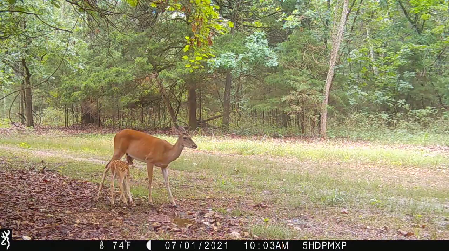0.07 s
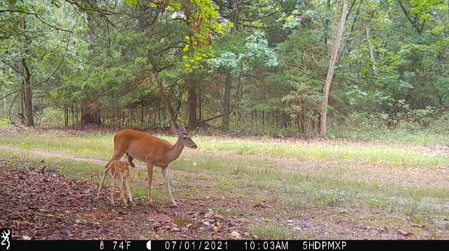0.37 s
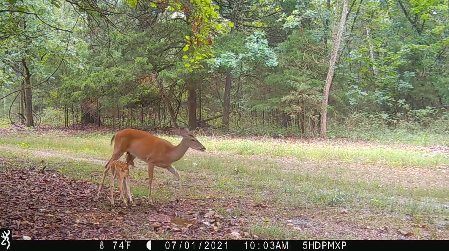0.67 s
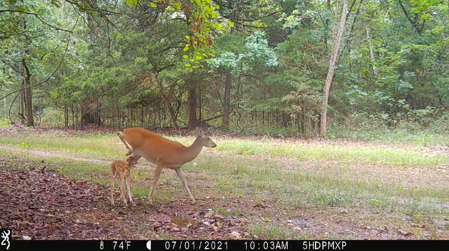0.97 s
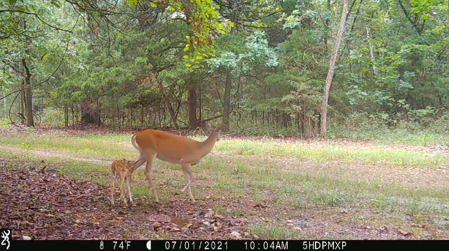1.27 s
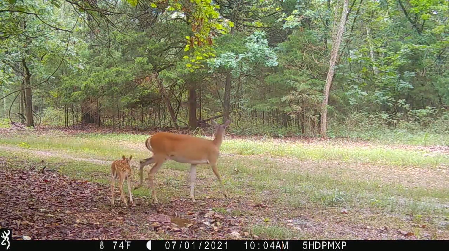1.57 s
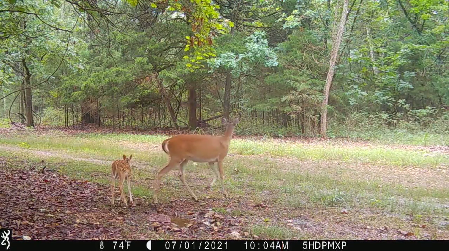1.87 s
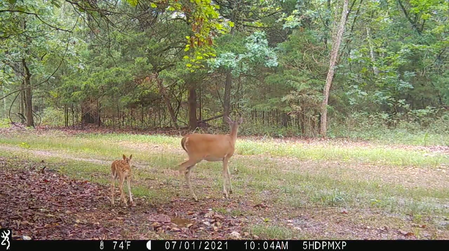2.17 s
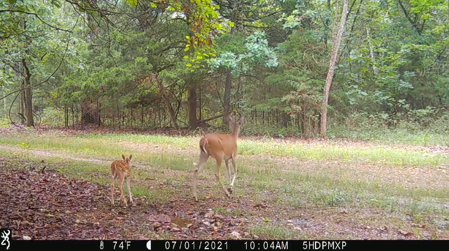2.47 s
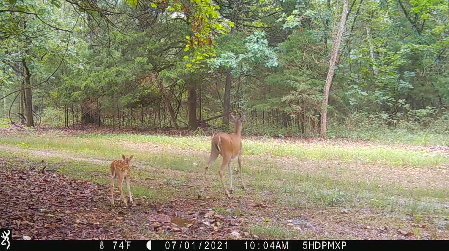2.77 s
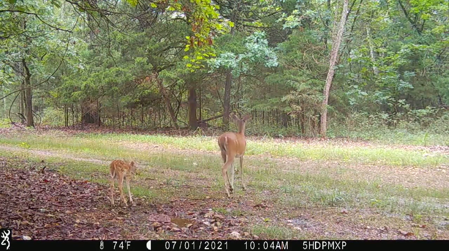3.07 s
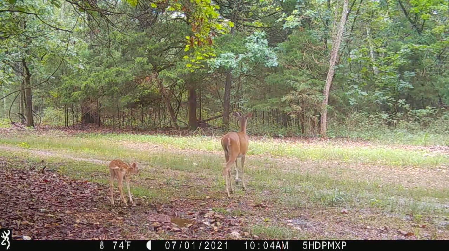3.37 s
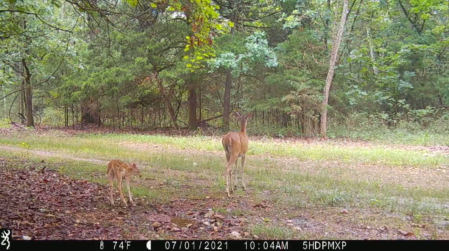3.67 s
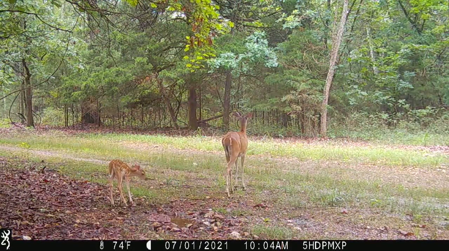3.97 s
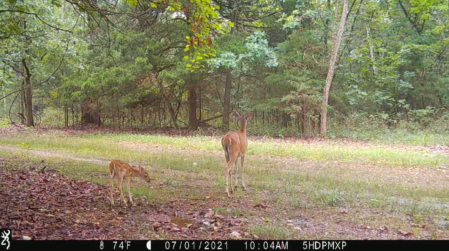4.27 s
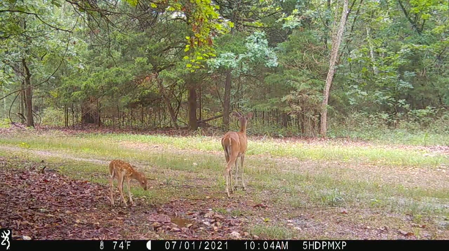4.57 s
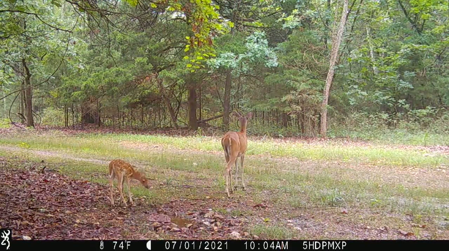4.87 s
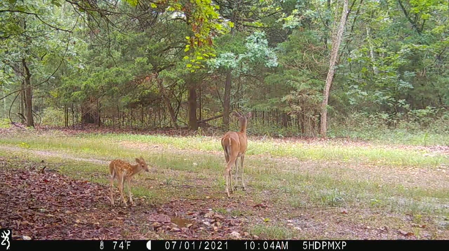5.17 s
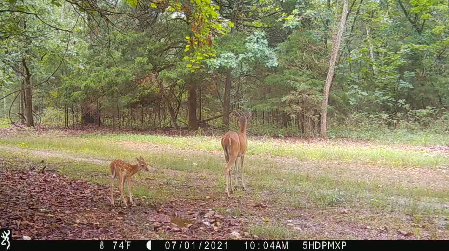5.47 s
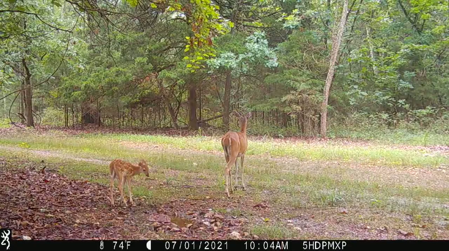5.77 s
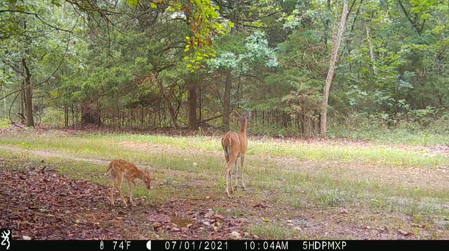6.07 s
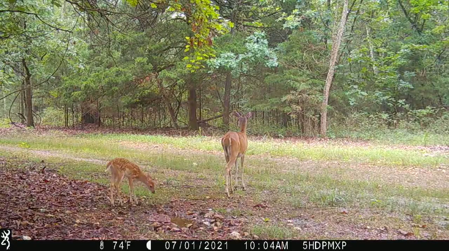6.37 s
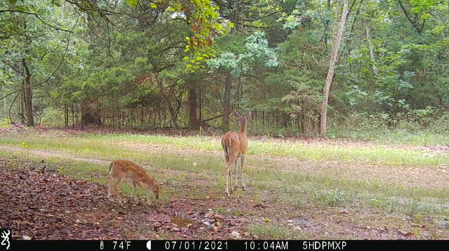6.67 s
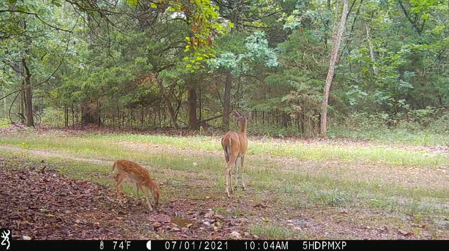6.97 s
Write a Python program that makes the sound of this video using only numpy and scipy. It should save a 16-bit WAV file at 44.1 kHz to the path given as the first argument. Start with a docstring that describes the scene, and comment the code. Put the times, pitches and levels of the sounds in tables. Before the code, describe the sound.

A faint, grainy hiss fills a quiet grassy clearing at the edge of a forest. It starts abruptly, with two barely audible spits of high fizz as a trail camera comes on. The rest is a steady rush of air and far-off trees, made rough and gritty by the low-quality mono microphone, with no other events.

```python
"""A still summer morning in a clearing by woods, heard through a trail camera.
First comes an instant of silence, then the camera switches on with two tiny, high fizzes.
From there to the end, air and far trees rush softly. The rush is smaller than one step of the
camera's converter (the part that turns sound into numbers), so the signal flips between two
neighbouring steps and the rush becomes a gritty hiss of constant loudness."""
import sys
import numpy as np
from scipy import signal
from scipy.fft import rfft, irfft, next_fast_len
from scipy.io import wavfile

SR = 44100
rng = np.random.default_rng(int(sys.argv[2]) if len(sys.argv) > 2 else 0)


def waveform_to_disk(signal):
    """Save audio, clipped to [-1, 1], as 16-bit WAV at the path in sys.argv[1]."""
    frames = np.transpose(np.atleast_2d(signal))
    scaled = np.clip(frames, -1, 1) * 32767
    samples = np.round(scaled).astype(np.int16)
    wavfile.write(sys.argv[1], SR, samples)


N = 318843
CLOCK_HZ = 16000  # samples the converter takes each second


def amp(db):
    """Turn decibels into a number to multiply by."""
    return 10 ** (np.asarray(db) / 20)


def filtered(x, gain_at):
    """Turn each frequency in x up or down by gain_at(hz)."""
    size = next_fast_len(N + SR // 2)
    hz = np.fft.rfftfreq(size, 1 / SR)
    return irfft(rfft(x, size) * gain_at(hz), size)[..., :N]


def noise(points):
    """Noise of strength 1, shaped by (f/Hz, level/dB) points and cut off at half the clock rate."""
    point_hz, point_db = np.transpose(points)

    def gain_at(hz):
        db = np.interp(np.log(hz + 1), np.log(point_hz), point_db)
        return amp(db) * (hz < CLOCK_HZ / 2)

    shaped = filtered(rng.standard_normal(N), gain_at)
    return shaped / np.std(shaped)


# The tone of the rush, with a thin edge of hiss at the very top. Columns: f/Hz, relative level/dB
RUSH_TONE = [(35, -21.3), (70, -13.5), (180, -8.0), (280, -3.7), (350, -0.8), (620, 0.0), (950, -0.7),
             (1400, -4.1), (2000, -8.4), (3200, -15.4), (5000, -23.5), (7400, -33.8), (8000, -18.5)]

def air_rush(level_db=-56.8):
    """Air and far trees make an even rush, strongest between 300 and 1200 Hz."""
    return amp(level_db) * noise(RUSH_TONE)


# The two fizzes at switch-on. Columns: t/s, length/s, level/dB, f/Hz
FIZZES = [(.074, .02, -59.5, 6530), (0.135, .004, -51, 7900)]

def switch_on_fizz():
    """Short spits of high noise just after the camera switches on."""
    t = np.arange(N) / SR
    fizz = np.zeros(N)
    for start, length, db, hz in FIZZES:
        sounding = (t > start) & (t < start + length)
        spit = noise([(hz / 2, -30), (hz * .9, -18), (hz, 0)])
        fizz += amp(db) * sounding * spit
    return fizz


def converter(sound, step_db=-45.15, switch_on_s=.072):
    """Round each sample down to a whole step, making grit; a rare peak reaches a third step and ticks."""
    step = amp(step_db)
    samples = signal.resample_poly(sound, CLOCK_HZ, SR)
    switched_on = np.arange(len(samples)) / CLOCK_HZ > switch_on_s
    return step * np.floor(samples / step) * switched_on


def smoothed(steps, span_samples=32):
    """Join the converter's samples with a smooth curve, which fades out near half the clock rate."""
    points_per_sample = SR // np.gcd(SR, CLOCK_HZ)
    curve = signal.firwin(span_samples * points_per_sample + 1, 1 / points_per_sample,
                          window=("kaiser", 9))
    return signal.resample_poly(steps, SR, CLOCK_HZ, window=curve)[:N]


def scene():
    """The rush and the fizzes; one microphone feeds both left and right."""
    return np.tile(air_rush() + switch_on_fizz(), (2, 1))


def record(dry):
    """The camera turns the faint sound into gritty hiss and drops the highest frequencies."""
    steps = converter(dry[0])
    hiss = filtered(smoothed(steps), lambda hz: hz < 9100)
    return np.tile(hiss, (2, 1))


dry = scene()
out = record(dry)
waveform_to_disk(out)
```